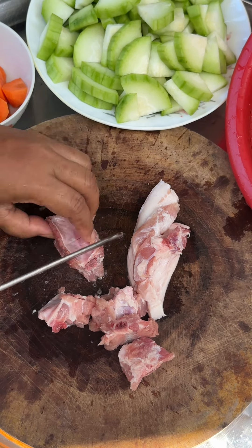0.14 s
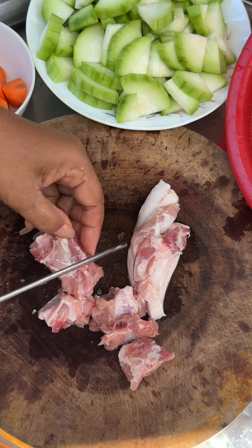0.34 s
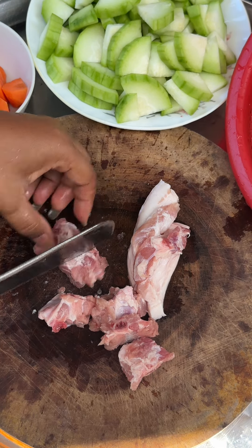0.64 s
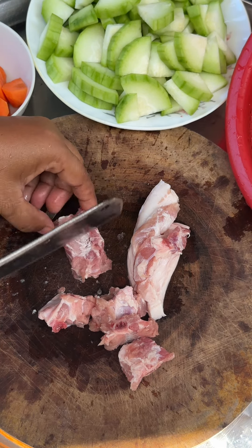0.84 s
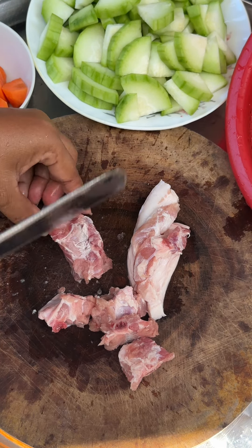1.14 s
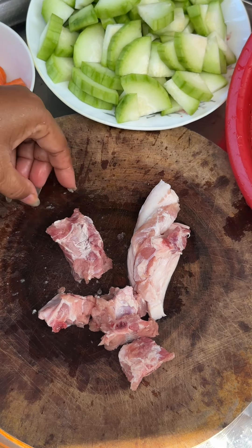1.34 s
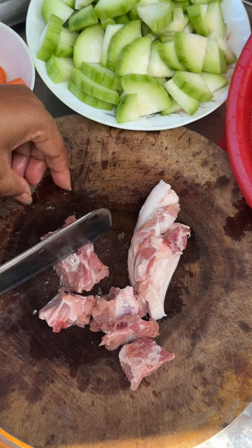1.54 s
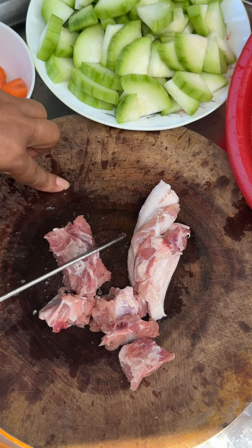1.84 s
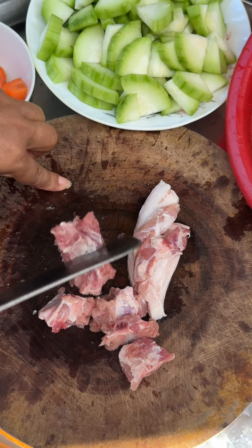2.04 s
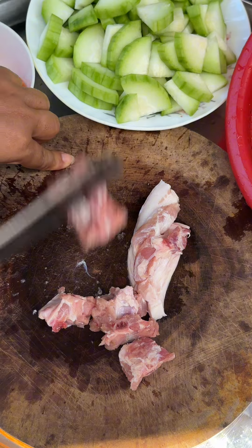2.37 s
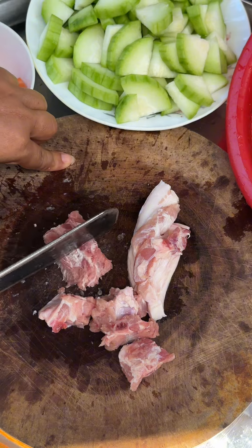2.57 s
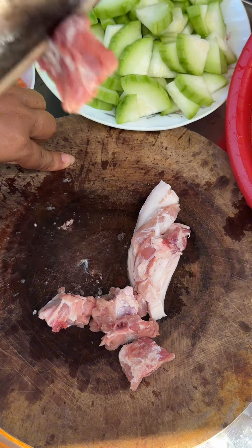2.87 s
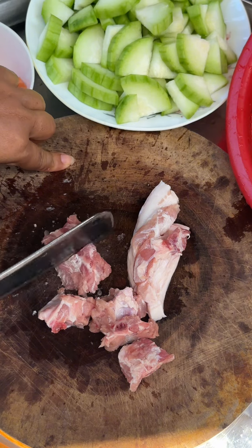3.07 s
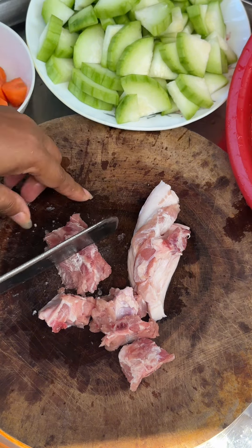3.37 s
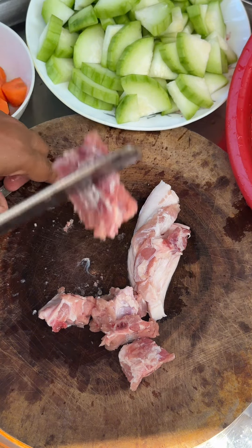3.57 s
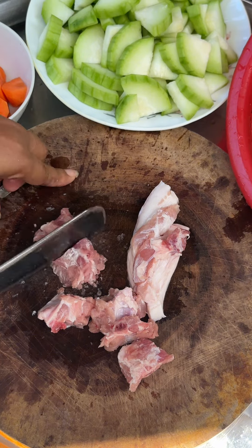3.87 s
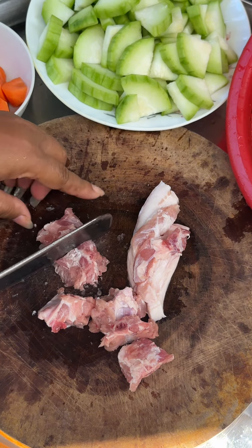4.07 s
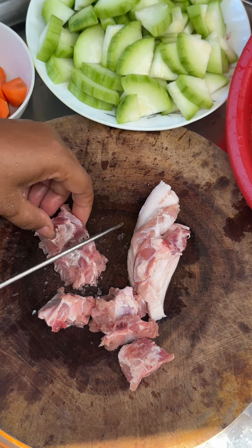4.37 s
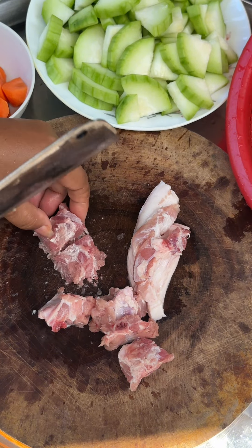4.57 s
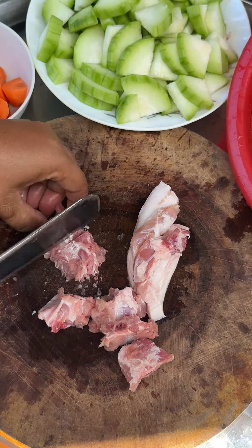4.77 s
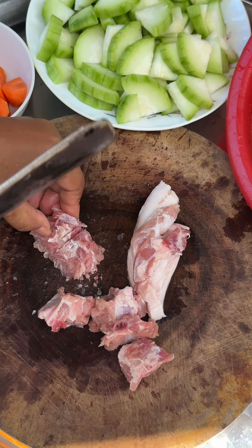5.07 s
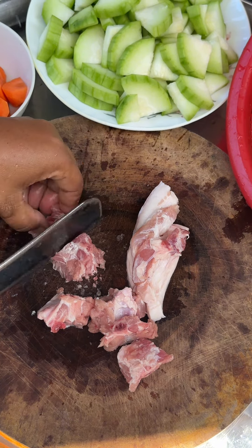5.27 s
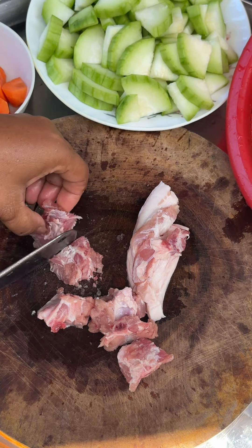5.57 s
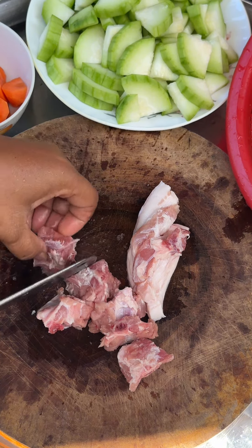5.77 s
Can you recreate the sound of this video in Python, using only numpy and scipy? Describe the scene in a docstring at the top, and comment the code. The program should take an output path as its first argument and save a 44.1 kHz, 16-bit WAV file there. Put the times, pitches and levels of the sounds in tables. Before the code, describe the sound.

Meat slides softly over a wooden block, a light tap follows, then a cleaver lands seven uneven, cracking chops. Each blow sets off a quick weakening rattle of the block, with short dish notes and a thin ringing metal basin. Close stereo pickup outdoors, a short yard echo, distant low rumble and faint bird calls.

```python
"""Meat slides twice over a wooden block (shaped hiss), a soft tap follows, and a far bird calls (falling tones).
From about one second a cleaver chops pork ribs seven times, close by: each blow is a push, a crush and wood modes.
After each blow the block clatters on its stand (runs of weakening knocks); dishes and a metal basin ring (damped
sines), and the basin buzzes (noise). Light touches fall between blows, and near the end the blade sings as it drags.
A short yard echo follows the work; a distant rumble and faint open air (noise) run throughout and swell at the end."""
import sys
import numpy as np
from scipy import signal
from scipy.fft import rfft, irfft, next_fast_len
from scipy.io import wavfile
from scipy.ndimage import uniform_filter1d

SR = 44100
rng = np.random.default_rng(int(sys.argv[2]) if len(sys.argv) > 2 else 0)


def waveform_to_disk(signal):
    """Save audio, clipped to [-1, 1], as 16-bit WAV at the path in sys.argv[1]."""
    frames = np.transpose(np.atleast_2d(signal))
    scaled = np.clip(frames, -1, 1) * 32767
    samples = np.round(scaled).astype(np.int16)
    wavfile.write(sys.argv[1], SR, samples)


N = 260622

TIME = np.arange(N) / SR
HIT_TIME = TIME[:SR // 2]
# contact levels are the loudness over 10 ms
HIT_SAMPLES = SR // 100
# half-octave bands from 28 Hz up
EDGES = 28 * 2 ** np.arange(0, 19, .5)[:20]
CENTRES = np.sqrt(EDGES[1:] * EDGES[:-1])
BANK = [signal.butter(2, pair, "band", fs=SR, output="sos") for pair in zip(EDGES, EDGES[1:])]

# Jolts of the basin. Each row: start in seconds, level in dB before the trim of ring or buzz,
# tilt of the ring in dB per octave, shaking time in seconds, then four best-excited pitches in Hz.
JOLTS = [(1.46, -44, -0.47, 0.034, 2510, 3688, 4307, 4517), (1.585, -41, -1.5, 0.1, 1803, 1954, 2299, 4526),
         (2.397, -41, 1.5, 0.041, 2869, 2670, 5434, 5141),
         (3.031, -45.5, 1.03, 0.026, 2482, 3070, 5250, 7063),
         (3.828, -45, -.5, 0.02, 1803, 3074, 4744, 4840),
         (4.709, -65, -0.31, 0.024, 2845, 4090, 4900, 6842),
         (5.235, -59.5, -1.8, .02, 2826, 4130, 4931, 6910)]
# Stereo width of echo and noise. Each row: pitch in Hz, side level minus mid level in dB.
STEREO_WIDTH = [(100, -40), (220, -25), (400, -10.5), (700, -6.5), (1250, -8), (2400, -37), (4400, -28),
                (8000, -11.5), (15000, -13.5)]


def from_db(db):
    """Turn decibels into gain."""
    return 10 ** (np.asarray(db) / 20)


def unit_rms(x):
    """Scale a steady sound to an rms (average strength) of 1."""
    return x / np.sqrt(np.mean(x ** 2) + 1e-30)


def unit_energy(x):
    """Scale a short sound to a total energy of 1."""
    return x / np.sqrt(np.sum(x ** 2) + 1e-30)


def in_time(rows, column=1):
    """Read a table as a curve with a value at every sample."""
    rows = np.array(rows)
    return np.interp(TIME, rows[:, 0], rows[:, column])


def at_hz(points, hz, axis=1):
    """Read a column of a spectrum at given pitches, with pitch on a log axis."""
    points = np.array(points)
    return np.interp(np.log(hz), np.log(points[:, 0]), points[:, axis])


def decay(t, t60):
    """A fade that falls 60 dB in t60 seconds."""
    return np.exp(-np.log(1000) * t / max(t60, 1e-4))


def add(out, s, sound):
    """Mix a sound in from time s on."""
    start = max(round(s * SR), 0)
    out[start:start + len(sound)] += sound[:N - start]


def mode(hz, t60):
    """One way a body can ring: a damped sine of unit energy, pushed either way."""
    ring = np.sin(2 * np.pi * hz * HIT_TIME) * decay(HIT_TIME, t60)
    return rng.choice([-1, 1]) * unit_energy(ring)


def contact(band_db, push, crush_s, t60, tail_db, tail_t60):
    """One contact: a sharp push, a few ms of crushing, then densely packed wood modes dying away."""
    t = HIT_TIME[:SR // 5]
    crush = decay(np.maximum(t - crush_s, 0), t60)
    envelope = crush + from_db(tail_db) * decay(t, tail_t60)
    # neighbouring bands take turns with two separate noises
    force = [unit_energy(rng.standard_normal(len(t)) * envelope) for turn in range(2)]
    out = np.zeros(len(HIT_TIME))
    for k, hz in enumerate(CENTRES):
        # the lows follow the single push, the highs the crushing
        drive = force[k % 2] + (t == 0) * push * (1000 / hz) ** .5
        band = unit_energy(signal.sosfilt(BANK[k], drive))
        out[:len(t)] += from_db(band_db[k]) * band
    return out


def strikes(table, colour, push, crush_s, t60, tail_db, tail_t60, note_db, note_t60, block_db, spread_db):
    """Contacts on the block: each sounds its own knock note and the block's modes, with new strengths."""
    # Centres of the five level zones in Hz: thump, knock, clack, crack and tick.
    zones_hz = [300, 1060, 1830, 3700, 7700]
    # Ring of block, stand and blade. Each row: pitch in Hz, level in dB against its zone before the
    # trim block_db, time in seconds to fall 60 dB.
    block_modes = [(142, -10.5, 0.15), (283, -2, 0.084), (420, -12, 0.027), (521, -5, 0.07),
                   (895, -5, 0.089), (1281, -7, 0.26), (1414, -16, .4), (1457, -11.5, 0.1),
                   (1630, -5.5, 0.045), (3340, -11.5, .1), (3383, -6.5, .1), (4654, -12, 0.086),
                   (5010, -10, 0.073), (5200, -8.5, 0.091), (7180, -12.5, 0.16), (7390, -11, 0.098),
                   (8250, -10.5, 0.072), (8460, -16, 0.068)]
    out = np.zeros(N)
    pitches, mode_db, ring_t60 = np.transpose(block_modes)
    rings = np.array([mode(hz, length) for hz, length in zip(pitches, ring_t60)])
    for s, note_hz, *levels in table:
        zones = list(zip(zones_hz, levels))
        band_db = at_hz(zones, CENTRES) + at_hz(colour, CENTRES)
        hit = contact(band_db, push, crush_s, t60, tail_db, tail_t60)
        hit += from_db(at_hz(zones, note_hz) + note_db) * mode(note_hz, note_t60)
        scatter_db = spread_db * rng.standard_normal(len(pitches))
        strengths = from_db(at_hz(zones, pitches) + mode_db + block_db + scatter_db)
        hit += (strengths * rng.choice([-1, 1], len(pitches))) @ rings
        add(out, s, hit * np.sqrt(HIT_SAMPLES))
    return out


def cleaver():
    """The edge breaks through bone into the wood: a push, brief crushing and a short ring."""
    # Each row: start in seconds, knock note in Hz, then thump, knock, clack, crack and tick levels in dB
    # (per half octave over 10 ms, before the colour is added).
    chops = [(.9752, 1525, -32.5, -26, -31, -24, -50.5), (1.4443, 1110, -25.5, -26, -24, -17.5, -32.5),
             (2.3803, 1069, -22, -22.5, -17.5, -18.5, -29), (3.0125, 1132, -21, -22.5, -16.5, -20, -26.5),
             (3.8147, 1063, -28.5, -24, -22, -19, -21.5), (4.7015, 1668, -32, -32.5, -28.5, -31.5, -26),
             (5.2235, 1062, -29.5, -15, -21, -26.5, -34.5)]
    # Colour added to the zone levels. Each row: pitch in Hz, level in dB.
    chop_colour = [(28, -45), (55, -16.5), (100, -14.5), (170, -2.5), (260, 4.5), (450, 1.5), (660, -6.5),
                   (1050, 0), (2000, 1.5), (3700, -2.5), (7700, -3.5), (12000, -9), (15500, -5)]
    return strikes(chops, chop_colour, push=0.72, crush_s=0.0019, t60=0.016, tail_db=-20.5, tail_t60=.09,
                   note_db=3.5, note_t60=0.015, block_db=-4.5, spread_db=2.0)


def landings(count=9):
    """The rocking block lands again and again, strong at first, then weaker and further apart."""
    # Each row: first landing in seconds, how many seconds it keeps full strength, knock note in Hz,
    # then thump, knock and crack levels in dB; notes and levels are scattered from landing to landing.
    rattles = [(0.98, 0.00065, 1415, -34.5, -35, -52.5), (1.4598, 0.014, 1596, -33, -19, -30),
               (2.3957, 0.017, 1292, -36.5, -18, -30), (3.0311, .009, 1611, -30, -16, -29.5),
               (3.829, .008, 1317, -34, -19, -31.5), (4.707, .008, 1381, -34.5, -28, -41.5),
               (5.2306, .02, 879, -39, -24.5, -40.5)]
    # each gap is this many times the one before, with some scatter
    first_gap_s, gap_growth, gap_scatter = .0078, 1.13, 0.074
    # the loss grows by about fade_db each time the delay past full strength doubles, once well past fade_s
    fade_db, fade_s = 7.5, 0.0065
    level_scatter_db, note_scatter_octaves = 1.5, .08
    # clack against knock, and tick against crack
    clack_db, tick_db = -2.5, -0.5
    contacts = []
    for s, full_s, note_hz, thump, knock, crack in rattles:
        delay = 0
        for k, (late, harder, higher) in enumerate(rng.standard_normal((count, 3))):
            loss = fade_db * np.log2(1 + max(delay - full_s, 0) / fade_s)
            levels = np.array([thump, knock, knock + clack_db, crack, crack + tick_db])
            levels = levels - loss + level_scatter_db * harder
            note = note_hz * 2 ** (note_scatter_octaves * higher)
            contacts.append((s + delay, note, *levels))
            delay += first_gap_s * gap_growth ** k * (1 + gap_scatter * late)
    return contacts


def clatter():
    """The block falls back on its stand in a quick run of knocks."""
    # Colour added to the zone levels. Each row: pitch in Hz, level in dB.
    rattle_colour = [(28, -35.5), (60, -10.5), (100, -5.5), (150, 0), (210, -1), (290, 0), (430, -3),
                     (660, -5), (1050, -2.5), (1900, -2), (7700, 1), (12000, -5), (15500, -11)]
    return strikes(landings(), rattle_colour, push=0.18, crush_s=.001, t60=0.037, tail_db=-13.5,
                   tail_t60=0.022, note_db=0, note_t60=0.046, block_db=-1.5, spread_db=1.0)


def strokes(table, attack_s, release_s):
    """Loudness of rubbing strokes: each rises, holds and lets go."""
    gain = 0
    for s, length, db in table:
        rise = (TIME - s) / attack_s
        fall = (s + length - TIME) / release_s
        gain = gain + from_db(db) * np.clip(np.minimum(rise, fall), 0, 1)
    return gain


def handling():
    """Soft taps, and the blade singing faintly as friction noise excites its modes."""
    # Light touches of blade and meat. Each row: start in seconds, then low, middle and high levels
    # in dB, from which the colour below is built.
    touches = [(.632, -48.5, -46, -58), (2.089, -65.5, -72, -73), (3.466, -93, -79, -62),
               (3.488, -85.5, -65.5, -65.5), (3.509, -70.5, -68, -65.5), (4.25, -72, -55, -63.5),
               (4.283, -75, -61.5, -66.5), (5.479, -65, -62.5, -67.5), (5.76, -64, -61.5, -79.5)]
    # Modes of the blade. Each row: pitch in Hz, relative level in dB.
    blade_modes = [(5100, -0.74), (7680, 0.29), (8650, -1.6)]
    # Drags of the blade. Each row: start in seconds, length in seconds, level in dB.
    drags = [(5.755, 0.078, -66)]
    out = np.zeros(N)
    for s, low, middle, high in touches:
        colour = [(50, low - 10), (250, low), (1400, middle - 3), (5500, high - 3), (15000, high - 12)]
        tap = contact(at_hz(colour, CENTRES), push=0.71, crush_s=0.0023, t60=0.027,
                      tail_db=-3.5, tail_t60=0.29)
        add(out, s, np.sqrt(HIT_SAMPLES) * tap)
    friction = rng.standard_normal(N)
    song = np.zeros(N)
    for hz, db in blade_modes:
        song += from_db(db) * signal.fftconvolve(friction, mode(hz, 0.079))[:N]
    return out + strokes(drags, attack_s=0.013, release_s=0.044) * unit_rms(song)


def slide():
    """Meat slid over the wood: shaped hiss that rises and lets go."""
    # Each row: start in seconds, length in seconds, level in dB.
    slides = [(-.04, 0.19, -68), (.21, 0.36, -69.5)]
    # Spectrum of the hiss. Each row: pitch in Hz, relative level in dB.
    hiss = [(800, -9), (2000, 1), (4000, -2), (7000, -3), (10000, -7), (15000, -21)]
    return strokes(slides, attack_s=0.039, release_s=0.12) * noise(hiss)


def dishes(rise_s=.005):
    """A dish beside the block, jogged by a shock, gives one short clear note."""
    # Each row: start in seconds, pitch in Hz, level in dB, time in seconds to fall 60 dB.
    notes = [(.989, 1280, -36, 0.11), (1.5, 1253, -29.5, 0.26), (2.428, 1305, -25, 0.29),
             (3.06, 1278, -31.5, 0.36), (3.109, 5400, -33.5, .12), (3.86, 1253, -39.5, 0.43),
             (4.721, 1250, -30.5, 0.23), (5.245, 910, -29, .22)]
    out = np.zeros(N)
    swell = 1 - np.exp(-HIT_TIME / rise_s)
    for s, hz, db, t60 in notes:
        tone = np.sqrt(2) * np.sin(2 * np.pi * hz * HIT_TIME)
        add(out, s, from_db(db) * tone * swell * decay(HIT_TIME, t60))
    return out


def basin(spread_db=1.0, favour_db=7.0, favour_octaves=0.038, split_hz=2.1, twin=0.68, ring_db=2.0):
    """Each jolt shakes the thin metal wall; its nearly evenly spaced modes come in slowly beating pairs."""
    # Modes of the wall. Each row: pitch in Hz, relative level in dB.
    wall_modes = [(1803, -61.5), (1954, -60.5), (2121, -72), (2299, -74), (2482, -66.5), (2670, -68.5),
                  (2869, -68), (3074, -68), (3273, -75.5), (3688, -69), (3892, -71.5), (4102, -78),
                  (4307, -74.5), (4517, -76), (4721, -84), (4931, -74.5), (5141, -84.5), (5346, -72.5),
                  (5556, -79), (6191, -91), (6406, -90.5), (6621, -92), (6842, -84.5), (7063, -85.5),
                  (7515, -86.5), (7741, -82), (8253, -84.5), (8936, -86)]
    # Ring time. Each row: pitch in Hz, time in seconds to fall 60 dB.
    ring_times = [(1800, .75), (2700, 1.05), (3700, 1.3), (5300, 1.7), (7100, 1.9), (9000, 1.3)]
    out, t = np.zeros(N), TIME[:2 * SR]
    pitches, mode_db = np.transpose(wall_modes)
    rings = np.zeros((len(pitches), len(t)))
    for k, hz in enumerate(pitches):
        phase = 2 * np.pi * (hz * t + rng.random())
        # the twin lies half to one and a half times split_hz above
        beat = 2 * np.pi * (split_hz * (.5 + rng.random()) * t + rng.random())
        pair = np.sin(phase) + twin * np.sin(phase + beat)
        rings[k] = pair * decay(t, at_hz(ring_times, hz))
    for s, level_db, tilt_db, shaking, *favoured in JOLTS:
        # the rhythm of the rattle pumps some modes more: those near the best-excited pitches
        nearness = [np.exp(-(np.log2(pitches / hz) / favour_octaves) ** 2) for hz in favoured]
        boost_db = favour_db * np.max(nearness, axis=0)
        slope_db = tilt_db * np.log2(pitches / pitches[0])
        scatter_db = spread_db * rng.standard_normal(len(pitches))
        strengths = unit_energy(from_db(mode_db + slope_db + boost_db + scatter_db))
        swell = np.minimum(t / max(shaking, .001), 1)
        add(out, s, from_db(level_db + ring_db) * np.sqrt(2) * swell * (strengths @ rings))
    return out


def buzz(buzz_db=-8, buzz_t60=.4):
    """The basin's foot chatters where it rests: noise that swells while it is shaken, then settles."""
    # Spectrum of the buzz. Each row: pitch in Hz, relative level in dB per Hz.
    buzz_spectrum = [(600, -10), (1300, 0.5), (2200, -3), (4500, -9), (8000, -16), (10500, -28.5)]
    gain, t = np.zeros(N), TIME[:SR]
    for s, level_db, tilt_db, shaking, *favoured in JOLTS:
        swell = np.minimum(t / max(shaking, .001), 1)
        settling = decay(np.maximum(t - shaking, 0), buzz_t60)
        add(gain, s, from_db(level_db + buzz_db) * swell * settling)
    return gain * noise(buzz_spectrum)


def widening(x, lag_s=0.00063, level_db=-24.0):
    """A faint late copy of the middle range, opposite in sign left and right, widens the blows."""
    # Lower and upper limit of the copied range, in Hz.
    band_hz = (480, 2600)
    out = np.zeros(N)
    middle = signal.sosfilt(signal.butter(2, band_hz, "band", fs=SR, output="sos"), x)
    add(out, lag_s, middle)
    return from_db(level_db) * out * [[1], [-1]]


def stereo_bands(size):
    """Half-octave noise bands, rms 1 each; STEREO_WIDTH makes them wider near 700 Hz, nearly mono near 2.4 kHz."""
    white = rng.standard_normal((2, 2, size + SR // 4))
    for k, hz in enumerate(CENTRES):
        mid, side = signal.sosfilt(BANK[k], white[k % 2])[:, -size:]
        yield hz, unit_rms(mid + from_db(at_hz(STEREO_WIDTH, hz)) * side * [[1], [-1]])


def yard_echo(x, first_s=0.0075, build_s=0.0048):
    """Nearby walls and roof send back a short diffuse tail, made of fading noise bands."""
    # Each row: pitch in Hz, level in dB, time in seconds to fall 60 dB.
    echo = [(100, -21, 0.29), (300, -18, 0.27), (600, -16, 0.52), (1120, -16, .37), (1990, -19.5, 0.47),
            (4000, -12, 0.27), (7800, -11.5, 0.25), (15000, -19, 1)]
    t = TIME[:SR]
    onset = np.clip((t - first_s) / build_s, 0, 1)
    response = 0
    for hz, band in stereo_bands(len(t)):
        # the band's share of the whole frequency range
        share = np.sqrt(2 * hz * (2 ** .25 - 2 ** -.25) / (SR / 2))
        tail = unit_energy(band * onset * decay(t, at_hz(echo, hz, axis=2)))
        response = response + share * from_db(at_hz(echo, hz)) * tail
    return signal.fftconvolve(x[None], response, axes=1)[:, :N]


def bird(blur_hz=220, fall_hz_per_s=3700):
    """Thin falling calls, blurred by distance: tones whose pitch wavers at random."""
    # Each row: start in seconds, length in seconds, starting pitch in Hz before the waver, level in dB.
    calls = [(0.66, 0.1, 3870, -80), (0.809, .15, 4000, -75), (1.17, 0.12, 3700, -89),
             (1.336, 0.18, 3600, -72.5), (1.932, .1, 3205, -72.5), (4.321, 0.077, 4280, -76.5)]
    out = np.zeros(N)
    for s, length, start_hz, db in calls:
        size = int(length * SR)
        waver = unit_rms(uniform_filter1d(rng.standard_normal(SR), size=40))[:size]
        hz = start_hz - fall_hz_per_s * TIME[:size] + blur_hz * waver
        call = np.sin(2 * np.pi * np.cumsum(hz) / SR) * np.hanning(size)
        add(out, s, from_db(db) * unit_rms(call))
    return out


def noise(spectrum):
    """Stereo noise of a given spectrum, rms 1, silent outside the spectrum's ends."""
    hz = np.maximum(np.arange(N // 2 + 1) * SR / N, 1)
    inside = (hz >= spectrum[0][0]) & (hz <= spectrum[-1][0])
    mid, side = rfft(rng.standard_normal((2, N))) * from_db(at_hz(spectrum, hz)) * inside
    stereo = mid + from_db(at_hz(STEREO_WIDTH, hz)) * side * [[1], [-1]]
    return unit_rms(irfft(stereo, N))


def background(rumble_db=1.5, air_db=-68, air_follows=0.81):
    """Distant rumble under faint open air; the air follows most of the rumble's swing in dB."""
    # Rise and fall of the rumble. Each row: time in seconds, level in dB before the trim rumble_db.
    rumble_level = [(0.0, -57.5), (0.62, -58), (0.87, -55.5), (2.39, -53.5), (2.67, -56), (4.33, -57.5),
                    (5.91, -48.5)]
    # Spectra of the rumble and the open air. Each row: pitch in Hz, relative level in dB.
    rumble_spectrum = [(15, -42.5), (25, -23), (35, -22.5), (49, -2), (65, 2), (86, -8.5), (130, -2),
                       (177, -6.5), (216, -13.5), (305, -14.5), (325, -23), (408, -24), (600, -31.5),
                       (780, -62), (1320, -120)]
    air_spectrum = [(290, -29), (500, -9), (631, -4.5), (698, -5.5), (1050, -3), (1280, -9), (3250, -14),
                    (6420, -24), (11500, -42.5), (16000, -33.5)]
    level = in_time(rumble_level)
    rumble = from_db(level + rumble_db) * noise(rumble_spectrum)
    air = from_db(air_db + air_follows * (level - level.mean())) * noise(air_spectrum)
    return rumble + air


def scene():
    """Work on the block, widened and echoed, ringing kitchenware, and the yard behind."""
    work = cleaver() + clatter() + handling()
    ringing = dishes() + basin() + buzz()
    return work + yard_echo(work) + widening(work) + ringing + bird() + slide() + background()


def record(dry):
    """Two microphone ports shift the treble against each other, peaks are rounded, the top is cut."""
    # Each row: pitch in Hz, phase in radians by which the left port leads.
    port_phase = [(100, 0), (4600, 0), (6200, -.5), (6700, -1.0), (8400, -1.8), (10600, -2.9),
                  (13800, -3.3), (16000, -4.4)]
    overload, cutoff_hz = 1.3, 16300
    size = next_fast_len(N + SR // 10)
    hz = np.maximum(np.arange(size // 2 + 1) * SR / size, 1)
    shifted = rfft(dry[0], size) * np.exp(1j * at_hz(port_phase, hz))
    left = irfft(shifted, size)[:N]
    rounded = overload * np.tanh(np.array([left, dry[1]]) / overload)
    return signal.sosfilt(signal.ellip(10, .2, 90, cutoff_hz, fs=SR, output="sos"), rounded)


dry = scene()
out = record(dry)
waveform_to_disk(out)
```